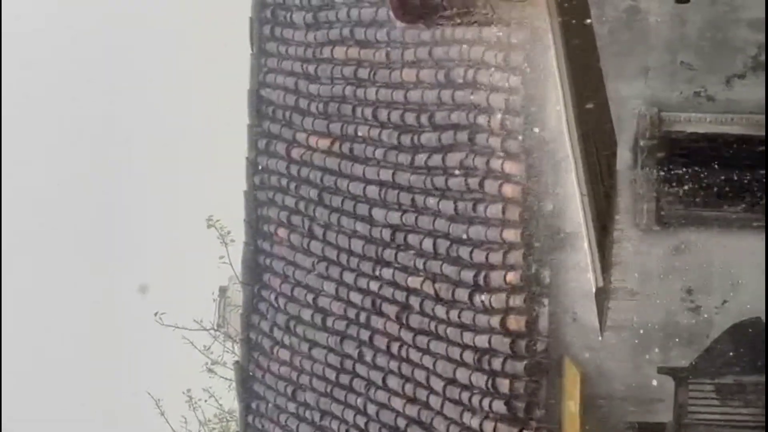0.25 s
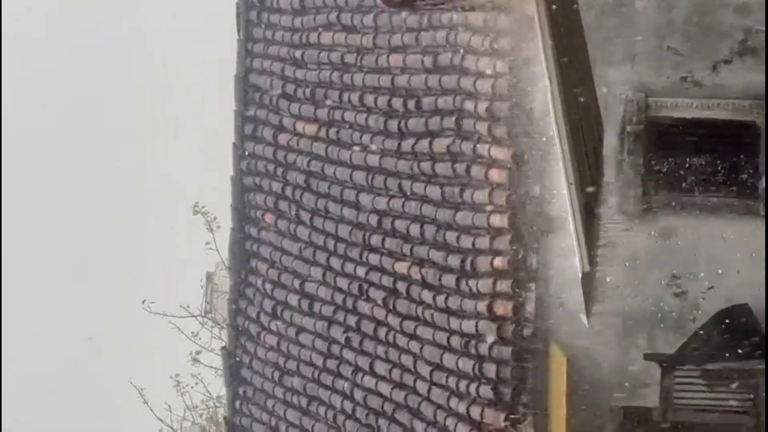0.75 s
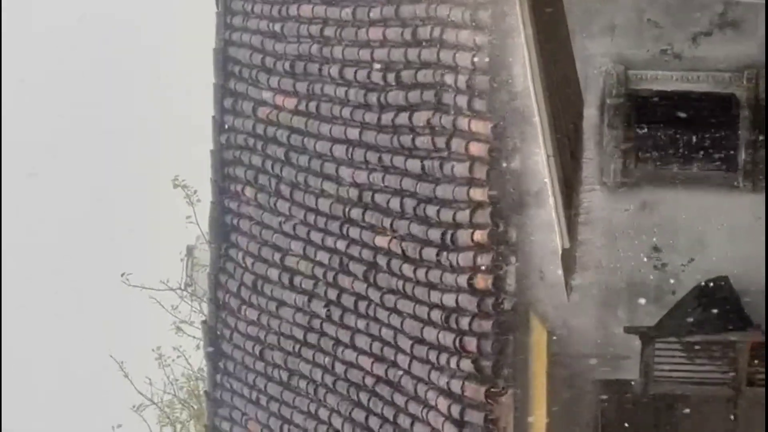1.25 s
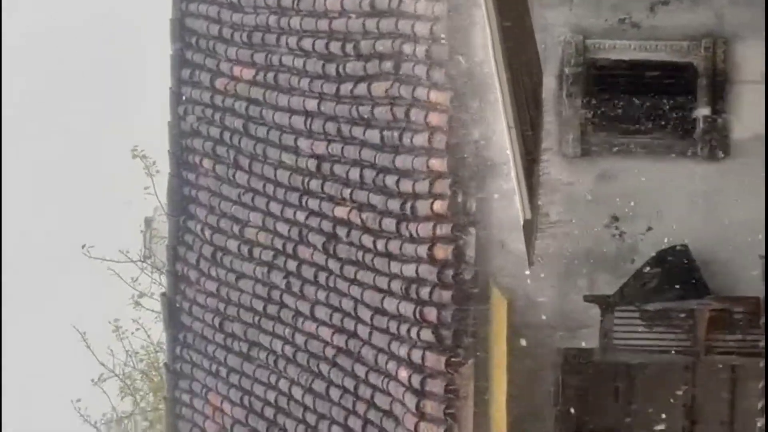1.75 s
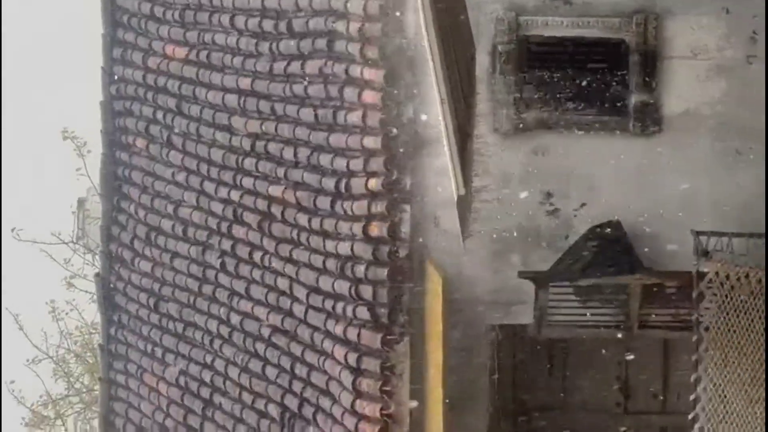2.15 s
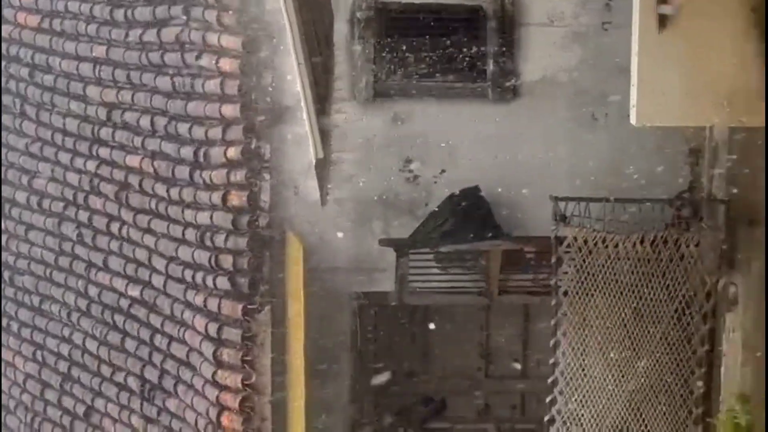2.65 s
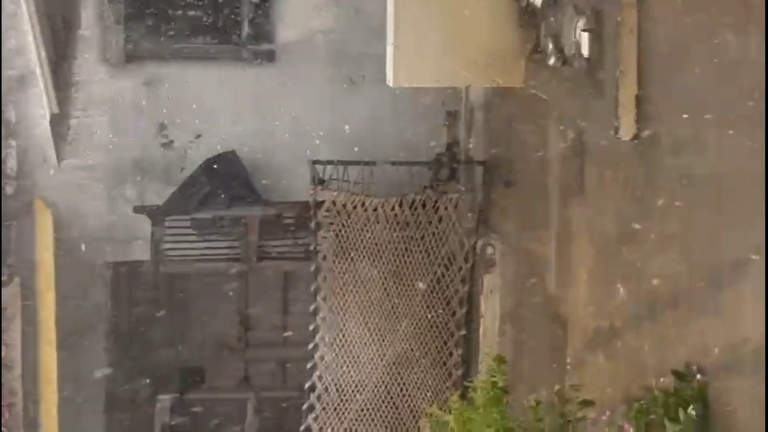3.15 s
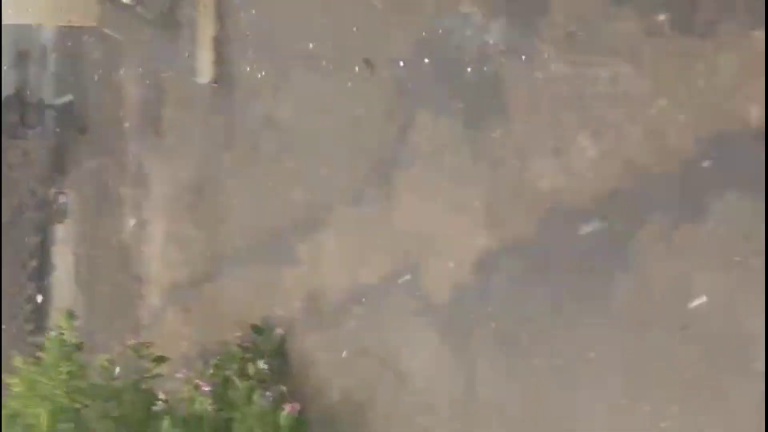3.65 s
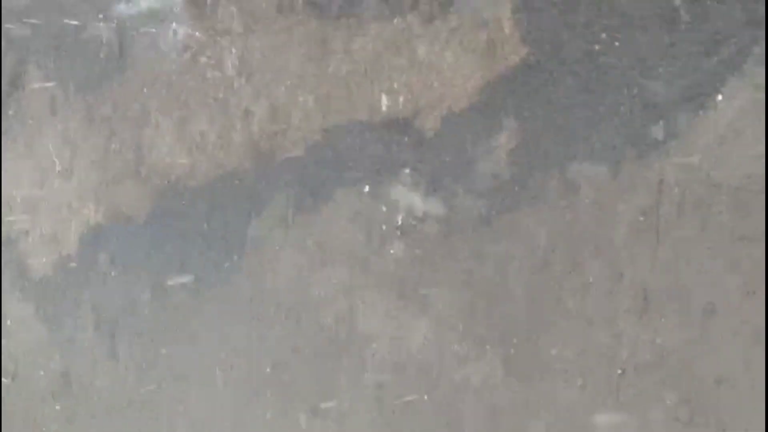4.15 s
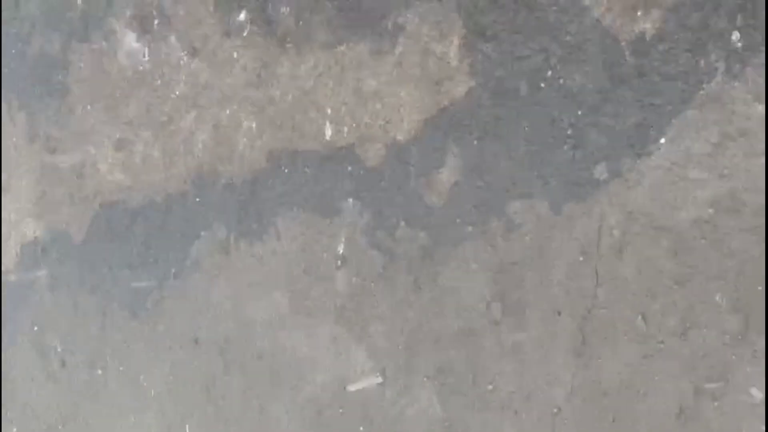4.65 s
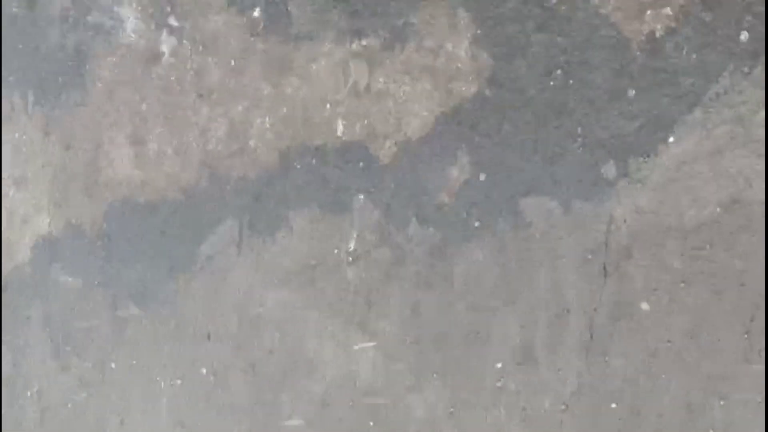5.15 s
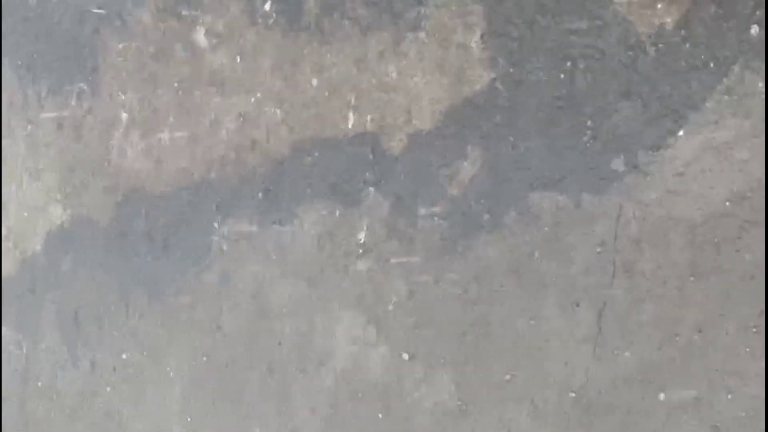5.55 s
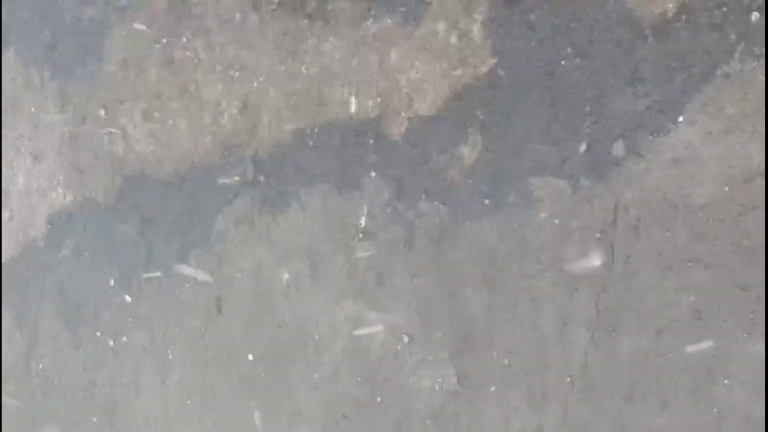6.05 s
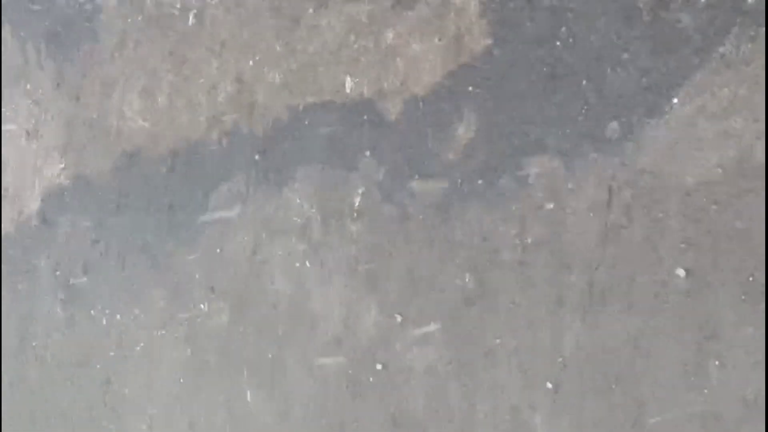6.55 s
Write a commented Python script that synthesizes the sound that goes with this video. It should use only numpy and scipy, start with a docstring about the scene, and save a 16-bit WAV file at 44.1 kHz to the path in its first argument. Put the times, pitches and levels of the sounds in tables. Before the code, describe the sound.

A steady downpour hisses over roof tiles and paving, as water splats off the eaves and close drops tick and plink.

```python
"""A paved yard beside a tiled roof, in heavy rain. Drops drum on the tiles, patter on the paving and
plink in puddles, over a fine spray and the wash of far drops. Gobs of water spill off the eaves and
splatter, single near drops tick, and now and then one rings sheet metal or something hollow.
A faint low handling rumble lies underneath, and the house walls return a short echo.
A little past halfway, the listener turns from the roof to the yard."""
import sys
import numpy as np
from scipy import signal
from scipy.fft import rfft, irfft, next_fast_len
from scipy.io import wavfile
from scipy.ndimage import map_coordinates

SR = 44100
rng = np.random.default_rng(int(sys.argv[2]) if len(sys.argv) > 2 else 0)


def materialize(psi):
    """Save the field psi as 16-bit PCM at rate SR to the path in sys.argv[1].

    A 1-D psi becomes a single channel; in a 2-D psi each row is a channel.
    """
    bounded = np.clip(np.atleast_2d(psi).T, -1, 1)
    quanta = np.round(bounded * 32767).astype(np.int16)
    wavfile.write(sys.argv[1], SR, quanta)


N = 299880
TOP_HZ = 11500  # the highest pitch heard


def amp(db):
    """Turn decibels into a number to multiply a sound by."""
    return 10 ** (np.asarray(db) / 20)


def unit(x):
    """Scale a sound to an average size (rms) of 1."""
    return x / np.sqrt(np.mean(x ** 2) + 1e-20)


def along(points, hz, column=1):
    """Read a table's column at any pitch, sliding between rows on a log scale."""
    table = np.transpose(points)
    return np.interp(np.log(hz + 1), np.log(table[0] + 1), table[column])


def curve(rows):
    """Join (seconds, value) points with straight lines."""
    return np.interp(np.arange(N) / SR, *np.transpose(rows))


def wobble(rate):
    """A smooth curve through `rate` random values a second."""
    return map_coordinates(rng.standard_normal(int(N * rate / SR) + 4), [np.arange(N) * rate / SR])


def bump(hz, centre, width):
    """A peak of height 1 around one pitch: a resonance."""
    return 1 / (1 + (2 * (hz - centre) / width) ** 2)


def filtered(x, response):
    """Turn each pitch in x up or down by response(hz)."""
    n = x.shape[-1]
    padded = next_fast_len(n + 8192)
    return irfft(rfft(x, padded) * response(np.fft.rfftfreq(padded, 1 / SR)), padded)[..., :n]


def add(track, start, sound):
    """Mix a sound into the track at `start` seconds."""
    part = track[max(round(start * SR), 0):][:len(sound)]
    part += sound[:len(part)]


def ping(t, hz, life):
    """A tone that fades to about a third in `life` seconds."""
    return np.sin(2 * np.pi * hz * t) * np.exp(-t / life)


def impacts(n, rate, spread_db):
    """Clicks of uneven size at random times, about `rate` a second."""
    hits = rng.random(n) < rate / SR
    size_db = spread_db * np.minimum(rng.exponential(size=n), 4.5)
    return unit(hits * amp(size_db) * rng.choice([-1, 1], n))


def drops(count, pitch_hz, scatter, cycles, spread_db, samples=256):
    """Drops land at random, each a ping of its own pitch and strength that rings for some cycles."""
    k = np.arange(samples)
    start = rng.integers(0, N, (count, 1))
    hz = np.minimum(pitch_hz * np.exp(scatter * rng.standard_normal((count, 1))), TOP_HZ)
    size_db = spread_db * np.minimum(rng.exponential(size=(count, 1)), 4.2)
    pings = amp(size_db) * np.sqrt(hz) * ping(k / SR, hz, cycles / hz)
    return unit(np.bincount((start + k).ravel(), pings.ravel(), N)[:N])


def shower(near, colour, wash_db):
    """Near drops over the blurred hiss of far ones, coloured by the surface they hit."""
    both = near + amp(wash_db) * rng.standard_normal(N)
    return unit(filtered(both, lambda hz: amp(along(colour, hz))))


def facing_yard(start_s=3.7, turn_s=0.36):
    """0 while the listener faces the roof, 1 once turned to the yard."""
    return np.clip((np.arange(N) / SR - start_s) / turn_s, 0, 1)


# How hard it rains. Each row: time in seconds, strength in dB.
RAIN_STRENGTH = [(0.0, -27.5), (0.37, -26.5), (0.48, -30), (0.8, -28.5), (1.0, -28.5), (1.33, -28.5),
                 (1.44, -30), (1.85, -28), (2.09, -29.5), (2.3, -27.5), (2.52, -29.5), (2.86, -26.5),
                 (3.2, -26.5), (3.7, -27.5), (3.92, -28), (4.2, -27.5), (4.4, -28), (4.7, -25.5),
                 (5.02, -27.5), (5.59, -26), (6.1, -26), (6.22, -26.8), (6.5, -25), (6.8, -27.5)]
def rain_level(average_db, growth, yard_db):
    """A level in dB that follows the rain's strength and gains yard_db as the listener turns."""
    strength_db = curve(RAIN_STRENGTH)
    return average_db + growth * (strength_db - strength_db.mean()) + yard_db * facing_yard()


# The tone of the tiles. Each row: pitch in Hz, level in dB.
ROOF_COLOUR = [(20, -32), (55, -9.5), (90, -8), (112, -4), (145, -6), (185, -4), (230, -3.5), (400, 0),
               (650, -6), (800, -1.5), (1000, -7), (2000, -16), (5000, -58)]
def roof(surge):
    """Rain drums on the tiles, with a hollow note that grows as the listener turns."""
    drumming = shower(impacts(N, rate=900, spread_db=3), ROOF_COLOUR, wash_db=2)
    drumming_db = rain_level(-35.5, growth=0.38, yard_db=0.65) + 0.39 * surge
    hollow = unit(filtered(rng.standard_normal(N), lambda hz: bump(hz, centre=603, width=190)))
    return drumming * amp(drumming_db) + hollow * amp(-57.5 + 14.5 * facing_yard())


# The tone of the paving. Each row: pitch in Hz, level in dB.
PATTER_COLOUR = [(200, -21), (600, 2.5), (1000, -3), (1600, -1), (2400, -3), (3500, -12), (8000, -18.5)]
# How loud the yard patters. Each row: time in seconds, level in dB.
PATTER_LOUDNESS = [(0, -33), (.5, -36), (.87, -34.5), (1.0, -33), (1.5, -34.5), (2.5, -35), (2.85, -32),
                   (3.15, -35), (3.6, -32), (3.93, -35.5), (4.1, -32), (4.4, -34), (4.72, -30), (5.55, -34),
                   (6.0, -29.5), (6.24, -35.5), (6.42, -31), (6.5, -27.5), (6.68, -31)]
def patter_and_plinks(surge):
    """Drops tap on the paving; in puddles they trap air bubbles, which ring far longer."""
    level_db = curve(PATTER_LOUDNESS)
    taps = drops(count=2200, pitch_hz=1473, scatter=0.34, cycles=2, spread_db=1)
    patter = shower(taps, PATTER_COLOUR, wash_db=11.5)
    plinks = drops(count=450, pitch_hz=2297, scatter=0.42, cycles=34, spread_db=1.1, samples=4096)
    return patter * amp(level_db + 0.8 * surge) + plinks * amp(level_db - 6.5)


# The tone of the spray. Each row: pitch in Hz, level in dB.
SPRAY_COLOUR = [(700, -29), (1800, -6), (2900, 2), (3800, 0.5), (5500, 1.5), (8000, 5), (11000, -3.5)]
def spray(surge):
    """Thousands of tiny drops merge into a bright, flickering hiss."""
    droplets = drops(count=9000, pitch_hz=5800, scatter=0.41, cycles=1.56, spread_db=3)
    hiss = shower(droplets, SPRAY_COLOUR, wash_db=9)
    level_db = rain_level(-23.5, growth=0.96, yard_db=0.1)
    return hiss * amp(level_db + 0.95 * surge + 0.4 * wobble(70))


# How loud the deepest drumming is. Each row: time in seconds, level in dB.
BOOM_LOUDNESS = [(0, -43), (.5, -49), (1.05, -51.5), (1.3, -42), (1.6, -51), (2.05, -48), (2.25, -41),
                 (2.6, -46.5), (3.0, -42.5), (3.42, -42.5), (3.55, -39), (4.0, -42.5), (5.1, -43.5),
                 (6.2, -43), (6.5, -41.5), (6.8, -40.5)]
# Its tone. Each row: pitch in Hz, level in dB.
BOOM_TONE = [(40, -27), (80, -6), (112, 1.5), (150, -2.5), (260, -5), (400, -12.5), (900, -49)]
def boom():
    """The deepest drumming of the rain swells and fades on its own."""
    return amp(curve(BOOM_LOUDNESS)) * shower(impacts(N, rate=300, spread_db=2), BOOM_TONE, wash_db=2.5)


def rumble():
    """A faint low handling rumble, fainter still once the listener faces the yard."""
    low_rumble = filtered(rng.standard_normal(N), lambda hz: bump(hz, centre=46, width=36) * (hz < 200))
    return unit(low_rumble) * amp(-59 - 11 * facing_yard())


# Gobs of water from the eaves. Each row: start in seconds, level in dB, lowest pitch in Hz,
# pitch of the trapped air in Hz, its boost in dB, seconds to land, seconds to fade by 60 dB.
GOBS = [(0.177, -18, 3000, 4500, 12, .01, .12), (1.125, -18.5, 3970, 4760, 4, .008, 0.14),
        (1.233, -23, 1700, 3450, 5, 0.0025, .17), (1.25, -24, 600, 1300, 3, .014, .4),
        (1.272, -26, 280, 495, 14.5, 0.018, 0.57), (1.665, -28.5, 350, 503, 12, .011, .35),
        (1.73, -22, 5200, 7500, 0, .02, .16), (1.765, -19.5, 4200, 7550, 6, .02, .18),
        (1.802, -26, 450, 1700, -1, 0.0086, .25), (1.902, -18, 3500, 4750, 1, .0045, .11),
        (2.162, -18.5, 3880, 4600, 2, 0.011, .18), (2.273, -20, 5000, 7750, 6, 0.0022, .1),
        (2.306, -15, 4000, 5370, 0.5, 0.0018, 0.25), (2.586, -23, 1100, 4600, 2.5, .008, 0.22),
        (2.716, -24, 2020, 4400, 9, .003, .19), (2.795, -21.5, 3500, 7900, 10, .003, .19),
        (3.365, -27, 900, 1500, 3, .02, .25), (3.485, -24, 260, 430, 5, 0.013, 0.31),
        (3.512, -16, 4070, 7500, 1, 0.01, 0.19), (3.562, -26, 280, 477, 13, 0.013, .2),
        (3.995, -22, 690, 1500, -2, .025, 0.37), (4.025, -21, 4700, 7000, 4.5, 0.02, .15),
        (4.232, -26, 2590, 3700, 3, .03, .16), (4.855, -22.5, 2600, 7800, 5, 0.017, 0.2),
        (5.388, -23.5, 2600, 3100, 7, .0065, 0.33), (5.486, -24, 2500, 3200, 5, 0.0044, 0.25),
        (5.55, -22.5, 3600, 5400, 4, .013, .17), (5.666, -19.5, 2390, 5600, 4, 0.006, 0.12),
        (5.725, -24, 2400, 2700, 8, .004, 0.16), (6.325, -17.5, 3800, 7300, 5, 0.019, .22),
        (6.371, -20.5, 2800, 6900, 8, 0.011, 0.21), (6.603, -17, 2400, 5770, 8, .002, .15)]
def splats(hold_s=0.011, crack_fade_s=0.041, half_crack_s=0.0078):
    """A gob cracks on the paving and bursts into a cloud of droplets; air trapped under it rings."""
    track, t = np.zeros(N), np.arange(SR // 2) / SR
    for start, db, low_hz, air_hz, air_db, land_s, fade_s in GOBS:
        cloud = unit(impacts(len(t), rate=2500, spread_db=-1) + rng.standard_normal(len(t)))
        sharpness = amp(-2) / (1 + (land_s / half_crack_s) ** 2)  # a slow landing cracks less
        crack = sharpness * impacts(len(t), rate=910, spread_db=-1)
        rise = np.minimum(t / land_s, 1)
        swell = lambda hold, fade: rise * amp(-60 * np.maximum(t - land_s - hold, 0) / fade)
        burst = cloud * swell(hold_s, fade_s) + crack * swell(0, crack_fade_s)
        dull_hz = 3000 + 4.4 * low_hz  # the splash weakens above this pitch
        band = lambda hz: 1 / np.sqrt((1 + (low_hz / (hz + 1)) ** 18) * (1 + (hz / dull_hz) ** 2.7))
        air_ring = lambda hz: amp(air_db * bump(hz, air_hz, width=0.21 * air_hz))
        colour = lambda hz: unit(band(hz) * air_ring(hz) * (hz < TOP_HZ))
        add(track, start, amp(db) * filtered(burst, colour))
    return track


# Drops on sheet metal. Each row: start in seconds, level in dB, pitch rung hardest in Hz,
# spread around that pitch in octaves.
METAL_HITS = [(1.236, -30, 3500, .12), (1.67, -32, 2900, .15), (1.906, -27.5, 2500, .13),
              (1.906, -25, 4740, .2), (2.72, -27.5, 1900, 1.1), (2.785, -35, 1077, .3),
              (3.56, -30, 1077, 0.27), (6.375, -22, 3150, 0.28), (6.605, -22, 2800, 0.4)]
# The sheet's own notes. Each row: pitch in Hz, level in dB, seconds to fade by 60 dB.
METAL_NOTES = [(1077, -5, 1.2), (1510, -7, 0.6), (2010, -0.5, 0.24), (2390, -5, 0.36), (2577, -1, 0.42),
               (2970, -0.5, 0.26), (3550, -1, 0.28), (4800, -2, .16)]
def clanks(waver_radians=0.54):
    """Wet sheet metal rings unsteadily; where a drop lands decides which notes sound."""
    track, t = np.zeros(N), np.arange(SR) / SR
    waver_times = np.arange(0, 1, 0.012)
    for start, db, focus_hz, octaves in METAL_HITS:
        for hz, note_db, fade_s in METAL_NOTES:
            share = np.exp(-0.5 * (np.log2(hz / focus_hz) / octaves) ** 2)
            waver = waver_radians * np.interp(t, waver_times, rng.standard_normal(len(waver_times)))
            note = np.sin(2 * np.pi * hz * t + waver)
            add(track, start, share * amp(db + note_db - 60 * t / fade_s) * note)
    return track


# Single near drops. Each row: start in seconds, level in dB, pitch in Hz.
NEAR_DROPS = [(1.38, -12.5, 1920), (1.852, -16, 3270), (2.568, -15.5, 1490), (5.207, -8, 7300),
              (5.89, -11.5, 1410), (5.96, -14, 1360), (6.101, -6.5, 3590), (6.123, -5, 4020)]
def ticks(cycles=1.7):
    """A near drop hits a hard surface with a dry tick."""
    track, t = np.zeros(N), np.arange(SR // 2) / SR
    for start, db, hz in NEAR_DROPS:
        add(track, start, amp(db) * ping(t, hz, cycles / hz))
    return track


# Drops on hollow things. Each row: start in seconds, level in dB, pitch in Hz, seconds to fade by 60 dB.
HOLLOW_HITS = [(1.39, -29.5, 305, 0.36), (2.555, -31, 408, 0.51), (2.975, -27, 662, 0.25),
               (6.603, -27, 174.7, 0.44)]
def hollow_rings():
    """Something hollow, struck by a drop, rings with one faint note."""
    track, t = np.zeros(N), np.arange(SR // 2) / SR
    for start, db, hz, fade_s in HOLLOW_HITS:
        add(track, start, amp(db) * ping(t, hz, fade_s / np.log(1000)))
    return track


def wall_echo(x, echo_db, fade_s):
    """House walls and paving return a short, dense echo of the higher pitches."""
    t = np.arange(SR // 4) / SR
    tail = rng.standard_normal(len(t)) * amp(-60 * t / fade_s) * (t > 0.002)
    tail = filtered(tail, lambda hz: hz ** 2 / (hz ** 2 + 1100 ** 2))
    response = (t == 0) + amp(echo_db) * tail / np.linalg.norm(tail)  # direct sound, then its echo
    return signal.fftconvolve(x, response[None] / np.linalg.norm(response), axes=1)[:, :N]


# How left and right compare. Each row: pitch in Hz, how far the left wave leads in radians,
# likeness from 0 to 1, how much louder the left is in dB.
STEREO_BANDS = [(90, 0.0, 1.0, 0.1), (250, -0.0, 0.98, 2.6), (470, -0.4, 0.9, 2.9), (620, 0.2, 0.55, 3.5),
                (700, -1.7, 0.51, 5.3), (850, -2.0, 0.6, -1.3), (1000, -0.2, 0.51, -1.9),
                (1300, 0.1, 0.92, -0.4), (1650, 0.0, 0.999, 0), (4500, 0.0, 0.999, 0),
                (4850, -0.2, 0.84, -0.3), (4950, -2.6, 0.79, 0.1), (5050, 0.0, 0.65, 0.0),
                (5300, 0.0, 0.995, 0), (7100, 0.0, 0.995, 0), (8000, -0.6, 0.79, 0.5),
                (9600, -2.0, 0.62, 0.2), (10200, -3.1, 0.83, -0.4)]
def stereo(shared, apart):
    """Most pitches reach both sides alike; in a few bands they part in timing and level."""
    side = np.array([[1], [-1]])  # left, right
    width = lambda hz: np.arccos(np.clip(along(STEREO_BANDS, hz, column=2), 0, 1)) / 2
    lead = lambda hz: np.exp(0.5j * side * along(STEREO_BANDS, hz, column=1))
    balance = lambda hz: amp(side * along(STEREO_BANDS, hz, column=3) / 2)
    return (filtered(shared, lambda hz: lead(hz) * balance(hz) * np.cos(width(hz)))
            + filtered(apart, lambda hz: lead(hz) * balance(hz) * side * np.sin(width(hz))))


def downpour():
    """All the dense water sounds; drumming, patter and spray share one quick, random surge."""
    surge = wobble(32)
    return roof(surge) + patter_and_plinks(surge) + spray(surge) + boom() + splats()


def scene():
    """One echoing downpour is shared by both sides; a second one makes it sound wide."""
    shared, apart = wall_echo(np.array([downpour(), downpour()]), echo_db=-11.5, fade_s=0.16)
    return stereo(shared + clanks() + ticks() + hollow_rings() + rumble(), apart)


# The microphone's tone. Each row: pitch in Hz, boost or cut in dB.
MICROPHONE_COLOUR = [(4500, 0.5), (4780, 2), (4960, -4), (5150, 0), (8000, -2), (9500, 1.5), (10500, -23.5),
                     (11500, -70)]
def record(dry):
    """The microphone dulls the highest pitches and keeps nothing above TOP_HZ."""
    return filtered(dry, lambda hz: amp(along(MICROPHONE_COLOUR, hz)) * (hz < TOP_HZ))


dry = scene()
out = record(dry)
materialize(out)
```